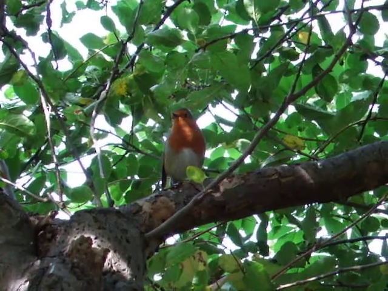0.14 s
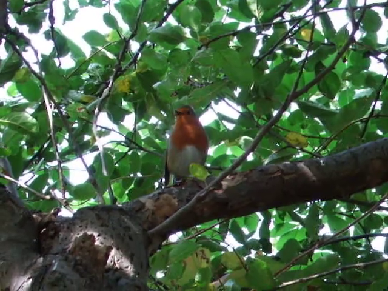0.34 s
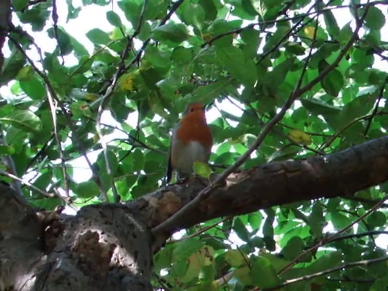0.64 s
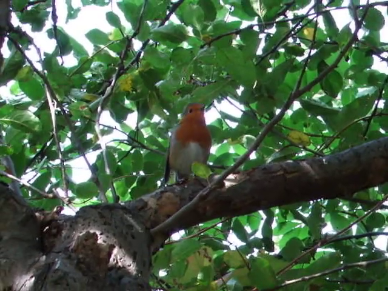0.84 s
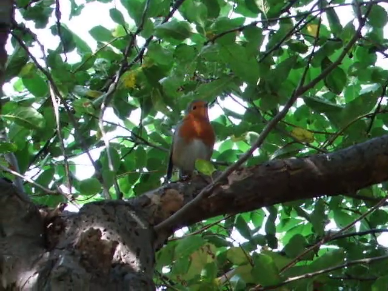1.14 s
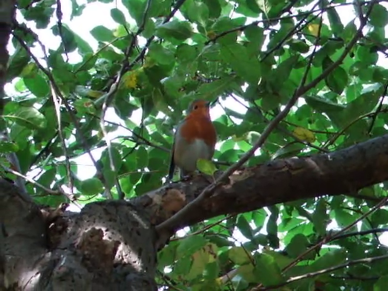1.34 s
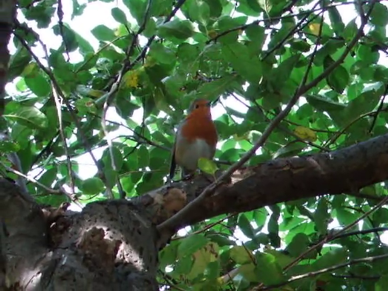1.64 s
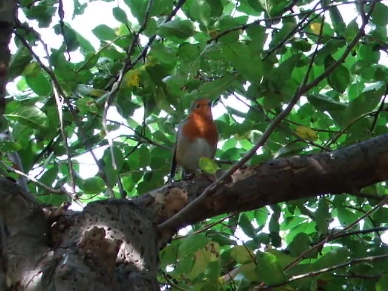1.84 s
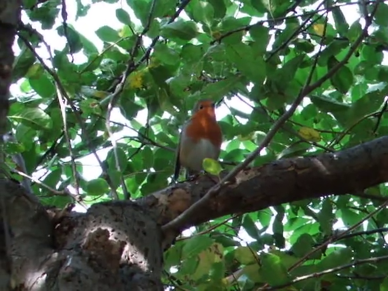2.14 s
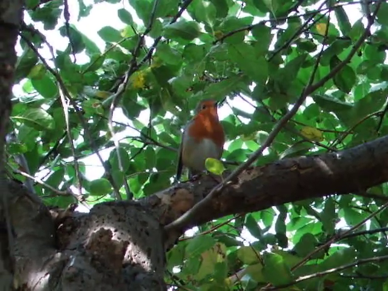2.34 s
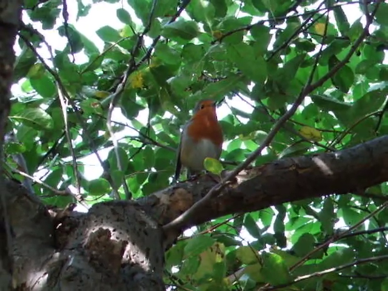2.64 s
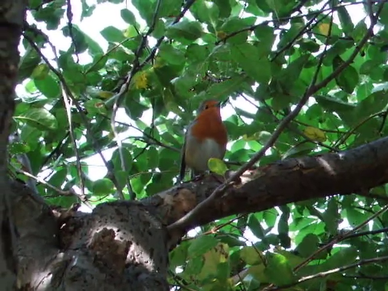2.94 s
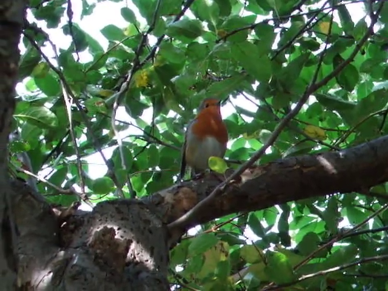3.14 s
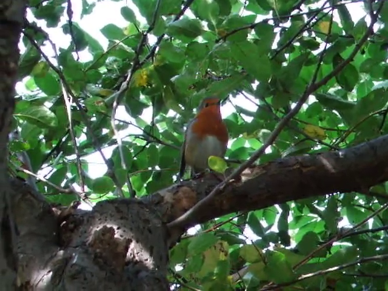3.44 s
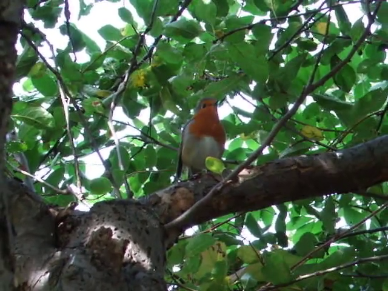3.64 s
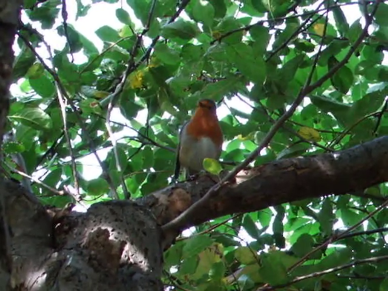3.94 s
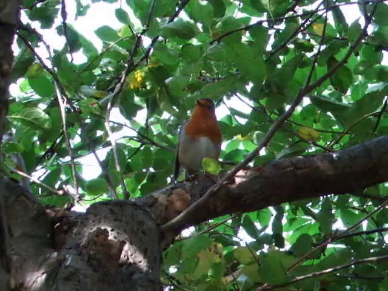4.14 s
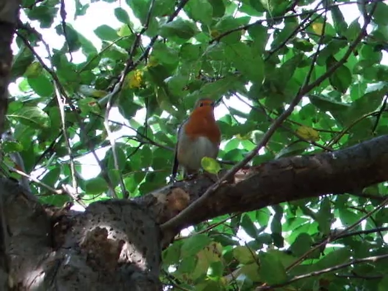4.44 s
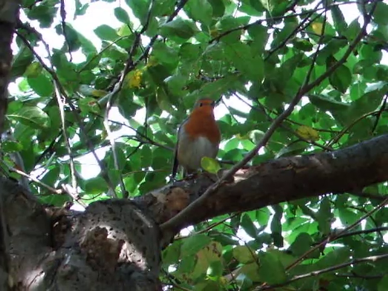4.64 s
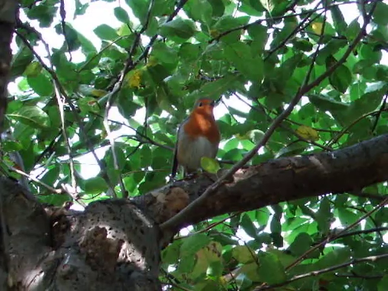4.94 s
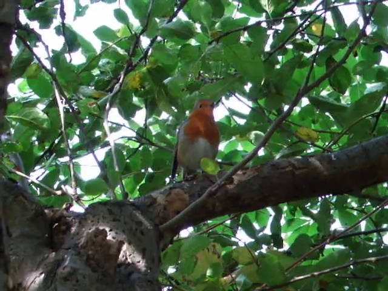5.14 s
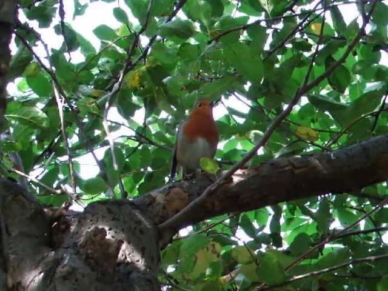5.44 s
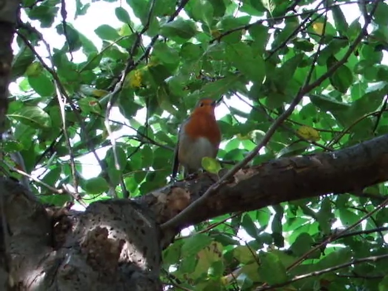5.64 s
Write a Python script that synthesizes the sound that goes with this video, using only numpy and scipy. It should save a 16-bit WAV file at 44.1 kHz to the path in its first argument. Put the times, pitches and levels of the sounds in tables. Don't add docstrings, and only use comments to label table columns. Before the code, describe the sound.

One small songbird in a leafy tree delivers a halting high whistle, quick bubbling warbles, sharp plunging notes and upward hooks above very quiet low rumble.

```python
import sys
import numpy as np
from scipy import signal
from scipy.fft import rfft, irfft, next_fast_len
from scipy.io import wavfile
from scipy.ndimage import uniform_filter1d

SR = 44100
rng = np.random.default_rng(int(sys.argv[2]) if len(sys.argv) > 2 else 0)


def linear_from_db(decibels):
    return 10 ** (np.asarray(decibels, float) / 20)


def unload_audio(sound):
    columns = np.transpose(np.atleast_2d(sound))
    steps = np.round(np.clip(columns, -1, 1) * 32767)
    wavfile.write(sys.argv[1], SR, steps.astype(np.int16))


N = 255339


def bird(flutter_db=1.8, clear_flutter_db=0.4):
    rough = warble() + buzzy_syllables() + reedy_syllable()
    clear = clear_syllables()
    breath = wander(160)
    fluttered = rough * linear_from_db(flutter_db * breath) + clear * linear_from_db(clear_flutter_db * breath)
    return whistles() + level_dips() * fluttered


# [t/s, f/Hz, level/dB]
OPENING_WHISTLES = [
    [(.444, 7600, -57), (.454, 7920, -54), (.49, 7870, -48), (.511, 7810, -43), (.53, 7850, -46),
     (.549, 7870, -44), (.558, 7935, -44), (.572, 7945, -44), (.578, 7960, -56)],
    [(.584, 7995, -47), (.592, 7995, -41), (.6, 7970, -54), (.608, 7950, -37), (.614, 7820, -38),
     (.621, 7900, -50), (.631, 7950, -46), (.636, 7900, -45), (.64, 7900, -52)],
    [(.651, 7930, -48), (.661, 7950, -53)],
    [(1.085, 7050, -56), (1.105, 6950, -53), (1.112, 7000, -60), (1.125, 7050, -53)],
]
# [t/s, f/Hz, level/dB]
HELD_WHISTLES = [
    [(.732, 7995, -42), (.748, 7977, -36), (.76, 8002, -35), (.772, 7967, -31), (.785, 7962, -33),
     (.797, 7970, -35), (.802, 7970, -44)],
    [(.805, 7992, -44), (.817, 7980, -30.5), (.826, 7930, -30), (.835, 7910, -35.5), (.847, 7900, -38),
     (.855, 7810, -27), (.87, 7710, -26), (.876, 7760, -29), (.882, 7790, -38)],
    [(.884, 7790, -36), (.893, 7770, -27), (.925, 7715, -27), (.932, 7700, -31), (.948, 7670, -27.5),
     (.97, 7640, -27.5), (.977, 7700, -33)],
    [(1.006, 7930, -44), (1.02, 7800, -42), (1.031, 7690, -34), (1.037, 7700, -46), (1.06, 7730, -36.5),
     (1.082, 7620, -33), (1.102, 7580, -29.5), (1.118, 7620, -32), (1.128, 7660, -39)],
    [(1.129, 7660, -39), (1.14, 7620, -31), (1.152, 7570, -25), (1.17, 7560, -28), (1.182, 7580, -30),
     (1.188, 7600, -23.5), (1.193, 7620, -31), (1.199, 7660, -29), (1.204, 7700, -40)],
    [(1.04, 8170, -52), (1.07, 8215, -46), (1.085, 8190, -37), (1.1, 8160, -34), (1.126, 8130, -36),
     (1.15, 8160, -35), (1.18, 8240, -37), (1.2, 8100, -39)],
    [(1.135, 7050, -49), (1.175, 6880, -48), (1.2, 7100, -53)],
]


def whistles(fade_s=0.0013, waver_hz=11):
    out = np.zeros(N)
    waver = waver_hz * wander(94)
    for rows in OPENING_WHISTLES + HELD_WHISTLES:
        s, hz, db = np.transpose(rows)
        t = np.arange(s[0], s[-1], 1 / SR)
        pitch_hz = np.interp(t, s, hz) + waver[round(s[0] * SR):][:len(t)]
        edge = np.clip(np.minimum(t - s[0], s[-1] - t) / fade_s, 0, 1)
        level = np.interp(t, s, linear_from_db(db)) * edge
        add(out, s[0], membrane(np.cumsum(pitch_hz) / SR, level, octave_db=-70))
    return out


# [t/s, length/ms, start f/Hz, end f/Hz, level/dB]
BUBBLING_PIPS = [(1.322, 6.4, 3910, 3900, -34.5), (1.332, 4.9, 4000, 4600, -45),
                 (1.368, 12, 4310, 4900, -39), (1.381, 30, 4650, 4600, -47), (1.394, 8.3, 2920, 4100, -33),
                 (1.403, 7.4, 3760, 3400, -37), (1.412, 10, 3690, 3400, -42), (1.429, 14, 4200, 4700, -38),
                 (1.461, 8.6, 4260, 5200, -46), (1.497, 8.7, 3210, 3260, -33.5),
                 (1.504, 10, 3790, 4000, -25.5), (1.51, 5.4, 4270, 5400, -28.5),
                 (1.514, 8.8, 4400, 4800, -28), (1.521, 4, 4540, 4100, -32), (1.525, 6, 4080, 4000, -35),
                 (1.533, 10.6, 3900, 4000, -34), (1.543, 5, 4400, 4800, -41), (1.546, 5.5, 4960, 4850, -38),
                 (1.552, 8.3, 4800, 4700, -28.5), (1.565, 4, 3840, 4500, -35),
                 (1.571, 7.2, 4470, 4100, -35), (1.581, 4.5, 4500, 4900, -42),
                 (1.585, 9.8, 4400, 4050, -38), (1.599, 26, 4100, 4700, -45), (1.605, 9.4, 5200, 5000, -35),
                 (1.626, 7, 4370, 3700, -42.5), (1.643, 18, 3710, 3820, -50), (1.648, 8.8, 4470, 4600, -34),
                 (1.667, 6, 4020, 4450, -43.5), (1.672, 8.5, 4420, 4800, -34), (1.68, 15, 4500, 5370, -40),
                 (1.694, 7.7, 4850, 3800, -40), (1.7, 13, 3850, 3800, -46), (1.714, 7, 4440, 4700, -30.5),
                 (1.724, 26, 4660, 4400, -46), (1.752, 11, 3960, 3800, -46.5), (1.769, 8, 4350, 4500, -36),
                 (1.785, 8, 4770, 5300, -46), (1.796, 5, 4820, 3800, -48), (1.803, 18, 4080, 3800, -48.5)]
# [t/s, length/ms, start f/Hz, end f/Hz, level/dB]
FLICKS_AND_SIDE_NOTES = [(0.643, 7.7, 8300, 7170, -35), (0.722, 8.2, 7400, 8950, -40),
                         (.975, 7.8, 7730, 7260, -32.5), (1.209, 18.8, 7830, 7620, -30.5),
                         (2.238, 33, 5300, 5300, -49), (2.55, 59, 5580, 5290, -51),
                         (2.548, 14, 1960, 1760, -53), (2.58, 18, 1690, 1900, -54),
                         (2.61, 22, 1890, 1685, -55), (3.397, 11, 7150, 7260, -46.5),
                         (2.771, 11, 4330, 4010, -37), (2.781, 19, 4005, 4300, -47),
                         (3.28, 17, 3200, 2680, -52), (3.771, 46, 3550, 2880, -44),
                         (3.782, 28, 6900, 6040, -50.5), (3.787, 24, 4870, 4300, -48.5),
                         (4.104, 9.8, 3820, 3850, -45), (4.225, 130, 1160, 1160, -60.5),
                         (4.01, 9.1, 5200, 5200, -49), (3.512, 19, 4000, 4300, -44),
                         (4.112, 12, 3490, 3400, -48), (4.232, 14, 4950, 5360, -47),
                         (4.767, 8.9, 7840, 6300, -38), (4.794, 13, 6440, 5930, -40),
                         (4.875, 12, 6970, 5100, -43), (4.927, 8, 7100, 6200, -48.5),
                         (5.155, 8.7, 5300, 3730, -38)]


def warble(fade_s=0.0036, droop_db=8.5, waver_hz=35, sag=0.15, crest=0.27):
    out = np.zeros(N)
    waver = waver_hz * wander(180)
    swing_hz, shake = buzz()
    for s, ms, start_hz, end_hz, db in BUBBLING_PIPS + FLICKS_AND_SIDE_NOTES:
        t = np.arange(-fade_s / 2, ms / 1000 + fade_s / 2, 1 / SR)
        u = t / (ms / 1000)
        at = slice(round(s * SR), round(s * SR) + len(t))
        trembling = shake[at] * (swing_hz[at.start] > 0)
        glide_hz = start_hz + (end_hz - start_hz) * u
        glide_hz -= sag * abs(end_hz - start_hz) * np.sin(np.pi * u)
        turns = np.cumsum(glide_hz + waver[at] + swing_hz[at] * trembling) / SR
        level = linear_from_db(db - droop_db * (u - crest) ** 2) * round_edge(t, fade_s)
        add(out, s + t[0], membrane(turns, level, octave_db=-23.5))
    return out


# [t/s, f/Hz, level/dB]
SLURRED_SYLLABLES = [
    [(2.099, 3870, -32.5), (2.106, 4060, -33), (2.113, 4130, -45), (2.13, 4430, -32.5), (2.146, 4420, -46),
     (2.164, 4390, -28.5), (2.197, 4750, -38), (2.221, 4550, -36.5)],
    [(2.219, 4260, -39.5), (2.26, 4620, -45), (2.295, 4520, -47.5), (2.312, 3850, -44.5), (2.32, 4000, -45)],
    [(2.322, 4300, -45), (2.333, 4650, -43), (2.339, 4600, -54), (2.346, 4400, -35), (2.35, 4450, -46)],
    [(2.408, 4030, -33), (2.415, 4110, -44), (2.425, 3970, -41.5), (2.468, 4270, -41), (2.48, 4120, -48.5),
     (2.497, 4350, -31.5), (2.514, 4670, -30.5), (2.525, 4370, -35)],
    [(2.523, 4530, -31), (2.56, 4340, -39), (2.598, 4570, -41), (2.616, 4420, -36.5), (2.647, 4570, -42),
     (2.662, 4630, -40)],
    [(2.672, 4200, -23.5), (2.675, 4640, -24), (2.681, 5280, -31.5), (2.69, 4700, -45)],
]
# [t/s, f/Hz, level/dB]
FALLING_SYLLABLES = [
    [(2.962, 4080, -38), (2.97, 4266, -35), (2.987, 4100, -40), (3.008, 4370, -31), (3.022, 4570, -31),
     (3.031, 4380, -29.5), (3.07, 4220, -41), (3.085, 3980, -45)],
    [(3.262, 2185, -45), (3.267, 2740, -30.5), (3.275, 1980, -34.5), (3.292, 1370, -50.5)],
    [(3.396, 3710, -32), (3.404, 3490, -35.5), (3.41, 4000, -34), (3.413, 4940, -39), (3.417, 5160, -30),
     (3.422, 4800, -35)],
    [(3.424, 4760, -29), (3.428, 5160, -32), (3.432, 4660, -35), (3.437, 4660, -27), (3.449, 4560, -35),
     (3.456, 3770, -35.5), (3.472, 2500, -45.5), (3.482, 2370, -52.5)],
    [(3.454, 5400, -42), (3.478, 4760, -45), (3.487, 5090, -41), (3.507, 5150, -35), (3.514, 5160, -47),
     (3.528, 4710, -42)],
    [(3.53, 4350, -42.5), (3.54, 2755, -33), (3.545, 2300, -33.5), (3.549, 2740, -30.5),
     (3.557, 1490, -40.5)],
    [(3.803, 2970, -38.5), (3.813, 2824, -36), (3.818, 2810, -33.5), (3.83, 1966, -31.5),
     (3.837, 1644, -37), (3.844, 1920, -48), (3.85, 1600, -52)],
]
# [t/s, f/Hz, level/dB]
TUMBLING_SYLLABLES = [
    [(1.343, 3950, -43), (1.349, 3760, -42), (1.353, 3300, -37), (1.358, 3120, -27.5), (1.366, 2940, -41.5),
     (1.378, 2770, -41)],
    [(1.38, 2820, -36), (1.386, 2665, -29), (1.39, 2575, -35), (1.394, 2840, -35), (1.402, 2780, -47),
     (1.42, 2565, -48), (1.432, 2380, -48)],
    [(1.436, 2895, -47), (1.446, 3090, -35), (1.451, 3260, -42), (1.455, 3810, -26), (1.46, 3880, -34.5),
     (1.466, 4190, -35), (1.475, 3520, -33.5), (1.484, 3220, -44)],
    [(3.671, 3050, -50), (3.679, 3520, -40), (3.689, 3270, -50), (3.695, 3490, -31), (3.703, 3910, -24),
     (3.71, 4560, -32), (3.719, 4480, -25), (3.727, 4360, -39)],
    [(3.933, 3960, -39), (3.941, 3770, -28.5), (3.949, 3390, -44), (3.959, 3900, -29.5),
     (3.966, 4150, -33.5), (3.972, 4450, -21.5), (3.976, 4170, -28)],
    [(3.977, 4070, -27), (3.985, 3860, -28.5), (3.995, 3890, -24.5), (4.008, 3650, -33.5),
     (4.021, 2820, -44)],
]


def buzzy_syllables():
    return slur(SLURRED_SYLLABLES + FALLING_SYLLABLES + TUMBLING_SYLLABLES, octave_db=-26, buzzy=True)


# [t/s, f/Hz, level/dB]
REEDY_SYLLABLES = [
    [(4.105, 2894, -67), (4.116, 2735, -38.5), (4.125, 2945, -49.5), (4.133, 3910, -31.5),
     (4.14, 3290, -44), (4.149, 3470, -38.5), (4.189, 1800, -46)],
]


def reedy_syllable():
    return slur(REEDY_SYLLABLES, octave_db=-14, buzzy=False)


# [t/s, f/Hz, level/dB]
UPPER_SYLLABLES = [
    [(2.372, 4400, -35), (2.375, 4820, -34), (2.377, 4830, -51), (2.382, 4820, -30.5), (2.388, 4830, -44),
     (2.412, 4830, -48), (2.428, 5340, -43), (2.459, 5480, -40), (2.478, 5410, -42), (2.492, 5485, -34.5),
     (2.503, 5350, -46)],
    [(2.713, 4970, -34.5), (2.73, 5040, -45), (2.755, 5500, -39), (2.765, 5400, -41.5)],
    [(4.597, 2700, -56), (4.606, 3670, -48), (4.616, 2110, -49), (4.631, 2620, -54)],
    [(3.721, 6500, -58), (3.731, 5730, -46), (3.752, 5290, -44), (3.77, 5200, -32), (3.776, 5260, -46),
     (3.785, 4900, -56)],
    [(1.486, 4450, -28), (1.492, 4424, -20.5), (1.497, 4380, -28), (1.499, 4430, -32)],
    [(4.209, 6950, -25), (4.234, 6700, -25), (4.242, 6350, -37), (4.25, 6740, -32), (4.259, 6100, -29.5),
     (4.275, 6070, -33.5), (4.288, 5040, -53)],
    [(4.399, 7340, -38), (4.408, 7320, -30.5), (4.429, 7250, -31), (4.441, 6930, -34), (4.466, 6220, -44),
     (4.479, 6200, -52)],
]
# [t/s, f/Hz, level/dB]
PIERCING_SYLLABLES = [
    [(4.578, 6880, -44), (4.593, 5750, -44.5), (4.602, 6400, -33.5), (4.61, 6420, -31), (4.617, 5700, -34),
     (4.629, 6040, -32), (4.648, 5200, -40)],
    [(4.824, 6840, -41), (4.833, 7330, -35), (4.842, 7470, -28), (4.852, 7300, -30.5), (4.857, 7100, -36),
     (4.864, 6720, -29), (4.872, 7300, -34)],
    [(4.901, 7180, -29), (4.909, 7100, -28.5), (4.918, 7400, -24), (4.924, 7550, -36.5), (4.938, 7640, -24),
     (4.946, 7620, -26), (4.954, 6300, -36)],
    [(4.955, 7750, -47), (4.961, 7370, -33), (4.966, 7250, -31), (4.972, 7050, -24.5), (4.981, 6250, -24.5),
     (4.988, 5530, -28.5), (4.999, 3900, -54)],
    [(5.049, 7440, -35), (5.055, 6770, -22), (5.064, 6500, -26.5), (5.072, 7000, -44)],
    [(5.075, 7480, -28), (5.094, 7640, -26.5), (5.112, 7260, -27.5), (5.131, 6100, -24),
     (5.14, 5410, -25.5), (5.146, 5340, -26.5), (5.156, 5280, -27)],
]
# [t/s, f/Hz, level/dB]
CLOSING_HOOKS = [
    [(5.218, 4900, -44), (5.226, 4760, -41), (5.234, 4900, -48)],
    [(5.238, 4800, -33), (5.241, 4580, -31.5), (5.244, 4440, -44), (5.25, 4620, -30), (5.257, 4580, -39),
     (5.263, 4870, -30.5), (5.272, 5240, -29.5), (5.279, 5240, -42)],
    [(5.353, 4520, -36), (5.357, 4870, -52), (5.361, 4980, -29), (5.372, 5150, -29), (5.388, 4950, -32),
     (5.393, 4870, -50), (5.404, 4940, -24)],
    [(5.405, 5020, -25), (5.413, 5730, -39), (5.42, 6260, -32.5), (5.427, 6820, -50.5), (5.432, 6370, -56)],
    [(5.474, 3910, -48), (5.48, 4480, -34), (5.486, 4570, -41), (5.497, 4850, -37), (5.513, 4790, -35.5),
     (5.524, 5410, -31.5), (5.535, 5430, -31), (5.538, 5550, -42)],
    [(5.538, 5700, -48), (5.544, 6170, -45), (5.55, 6000, -57)],
    [(5.584, 3850, -57), (5.61, 4570, -41), (5.616, 4710, -49), (5.622, 5004, -35), (5.638, 5140, -37.5),
     (5.646, 5130, -48), (5.68, 5080, -57)],
]


def clear_syllables():
    return slur(UPPER_SYLLABLES + PIERCING_SYLLABLES + CLOSING_HOOKS, octave_db=-40, buzzy=False)


def slur(syllables, octave_db, buzzy, fade_s=0.004, ease_s=0.0019, waver_hz=35, throb_db=2.6):
    out = np.zeros(N)
    waver = waver_hz * wander(200)
    swing_hz, shake = buzz()
    ease = round(ease_s * SR)
    for rows in syllables:
        s, hz, db = np.transpose(rows)
        t = np.arange(s[0] - fade_s / 2, s[-1] + fade_s / 2, 1 / SR)
        at = slice(round(t[0] * SR), round(t[0] * SR) + len(t))
        pitch_hz = uniform_filter1d(np.interp(t, s, hz), size=ease)
        turns = np.cumsum(pitch_hz + waver[at] + buzzy * swing_hz[at] * shake[at]) / SR
        effort_db = uniform_filter1d(np.interp(t, s, db), size=ease)
        effort_db += buzzy * throb_db * shake[at] * (swing_hz[at] > 0)
        add(out, t[0], membrane(turns, linear_from_db(effort_db) * round_edge(t, fade_s), octave_db))
    return out


# [t/s, length/ms, trembles/Hz, pitch swing/Hz]
BUZZY_STRETCHES = [
    (1.372, 62, 200, 120),
    (1.458, 28, 230, 350),
    (1.523, 26, 180, 160),
    (1.562, 30, 180, 120),
    (2.18, 140, 280, 280),
    (2.52, 80, 230, 240),
    (2.627, 40, 200, 180),
    (3.034, 56, 250, 230),
    (3.457, 80, 220, 150),
    (3.766, 45, 140, 380),
]


def buzz(uneven=0.46):
    swing_hz, rate_hz = np.zeros((2, N))
    for s, ms, trembles_hz, hz in BUZZY_STRETCHES:
        length = round(ms * SR / 1000)
        add(swing_hz, s, np.full(length, hz))
        add(rate_hz, s, np.full(length, trembles_hz))
    turns = np.cumsum(rate_hz * (1 + uneven * wander(90))) / SR
    return swing_hz, np.sin(2 * np.pi * turns)


BRIEF_DIPS = [1.5005, 2.1992, 2.5073, 2.5237, 2.5604, 2.6776, 2.7219, 2.7442, 3.4325, 3.4418, 3.4798,
              3.4956, 3.6867, 4.1435, 4.147, 4.2465, 4.256, 4.2625, 4.2792, 4.4345, 4.4446, 4.4602,
              4.5968, 4.613, 4.6209, 4.6341, 4.641, 4.969, 4.9825, 5.0745, 5.1343]


def level_dips(dip_s=0.0012, depth=0.8):
    gap = (np.arange(N) / SR - np.array(BRIEF_DIPS)[:, None]) / dip_s
    return np.prod(1 - depth * np.exp(-gap ** 2), axis=0)


def membrane(turns, level, octave_db):
    swing = np.sin(2 * np.pi * turns) + linear_from_db(octave_db) * np.sin(4 * np.pi * turns)
    return np.sqrt(2) * level * swing


def tree(x, t60_s, first_s):
    taps = np.zeros(SR // 2)
    at = np.arange(0, len(taps) - 20, 20)
    taps[at + rng.integers(0, 20, len(at))] = rng.choice([-1., 1.], len(at))
    t = np.arange(len(taps)) / SR
    taps *= linear_from_db(-60 * t / t60_s) * (t > first_s)
    return signal.fftconvolve(x, taps / np.linalg.norm(taps))[:N]


# [f/Hz, density/dB per Hz]
AIR_SPECTRUM = [(15, -8.5), (42, 2), (100, -12), (190, -7), (750, -8.5), (1500, -13.5), (7500, -14)]
# [t/s, level/dB, rumble gain/dB]
AIR_COURSE = [
    (0, -54, 3),
    (2.501, -55, 5),
    (4.2, -56, 9),
    (5.8, -56.5, 14),
]


def air(swell_db=0.2):
    top_db = AIR_SPECTRUM[-1][1]
    spectrum = AIR_SPECTRUM + [(7800, top_db), (8000, top_db - 6.5), (8030, -120)]
    hiss = coloured(rng.standard_normal(N), spectrum)
    mid = signal.sosfilt(signal.butter(4, [300, 1100], "band", fs=SR, output="sos"), hiss)
    deep = coloured(hiss, [(60, -20.0), (170, -3.5), (330, -36.0)])
    s, db, deep_db = np.transpose(AIR_COURSE)
    t = np.arange(N) / SR
    hiss += (linear_from_db(np.interp(t, s, deep_db)) - 1) * deep
    return hiss / mid.std() * linear_from_db(np.interp(t, s, db) + swell_db * wander(2.1))


def evened(x):
    return x / np.sqrt(np.mean(x ** 2) + 1e-20)


def coloured(x, points):
    size = next_fast_len(len(x) + 4096)
    hz, db = np.transpose(points)
    log_f = np.log(np.fft.rfftfreq(size, 1 / SR) + 1)
    gain = linear_from_db(np.interp(log_f, np.log(hz + 1), db))
    return irfft(rfft(x, size) * gain, size)[:len(x)]


def wander(hz):
    return evened(signal.lfilter(*signal.butter(2, hz, fs=SR), rng.standard_normal(N)))


def round_edge(t, fade_s):
    return np.sin(np.pi / 2 * np.clip(np.minimum(t - t[0], t[-1] - t) / fade_s, 0, 1)) ** 2


def add(mix, s, sound):
    part = mix[round(s * SR):][:len(sound)]
    part += sound[:len(part)]


def scene():
    song = bird()
    stirred = coloured(song * wander(100), [(1700, -10), (3000, 0), (5500, 0), (7800, -11)])
    crown = linear_from_db(-13) * tree(stirred, t60_s=0.24, first_s=0.005)
    bough = linear_from_db(-10.5) * tree(song, t60_s=0.075, first_s=0.002)
    return (song + bough + crown + air())[None]


def low_pass(x):
    return signal.sosfilt(signal.butter(12, 9350, fs=SR, output="sos"), x)


# [f/Hz, gain/dB]
SMOOTHING_FILTER = [(7300, -0.5), (8000, 0.5), (8400, -11.5), (8700, -23.5), (9000, -36.5), (9400, -92)]


def record(dry, camera_hz=16000, whine_hz=7680, whine_db=-69, offset=-0.0024):
    t = np.arange(N) / SR
    whine = linear_from_db(whine_db + 2.4 * wander(11)) * np.sin(2 * np.pi * whine_hz * t)
    caught = coloured(dry[0] + whine, [(8300, 0), (9000, -21.0), (10000, -55.0)])
    mirrored = caught * (1 + 2 * np.cos(2 * np.pi * camera_hz * t))
    mix = coloured(mirrored, SMOOTHING_FILTER)[None] + offset
    return low_pass(mix)


dry = scene()
out = record(dry)
unload_audio(out)
```